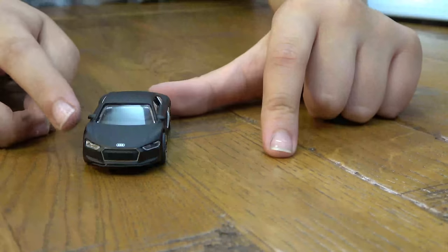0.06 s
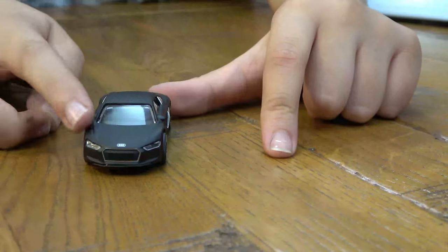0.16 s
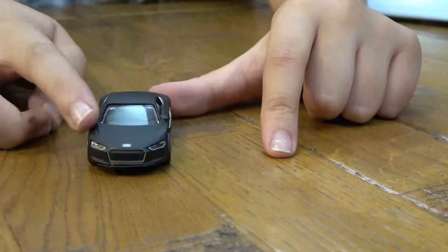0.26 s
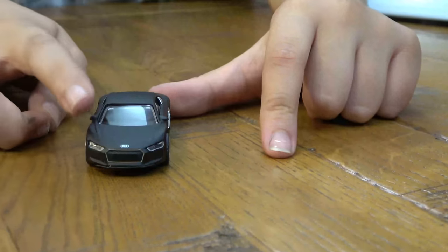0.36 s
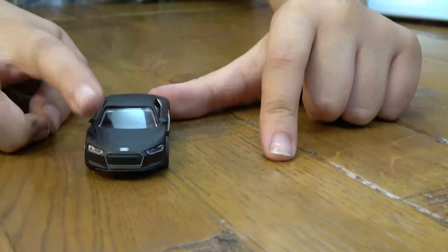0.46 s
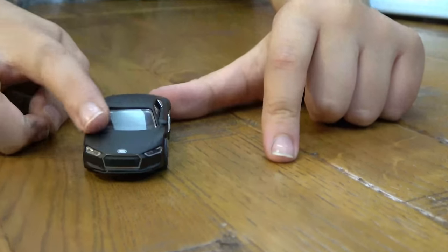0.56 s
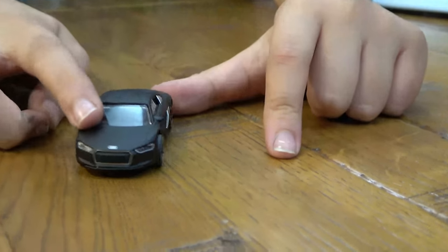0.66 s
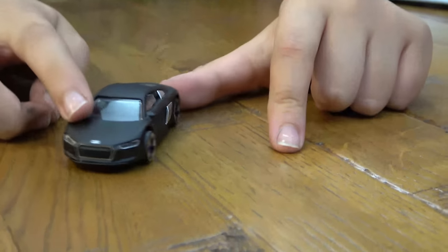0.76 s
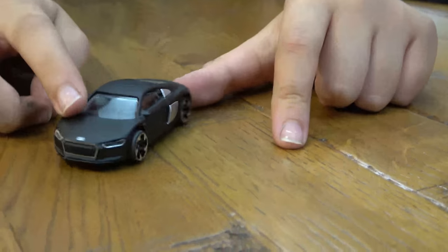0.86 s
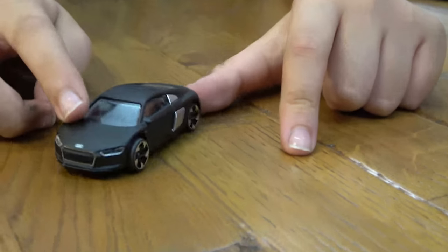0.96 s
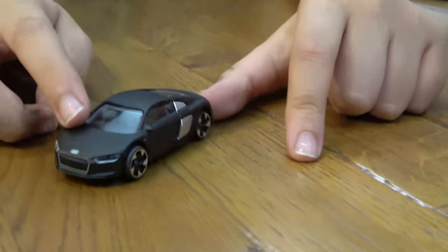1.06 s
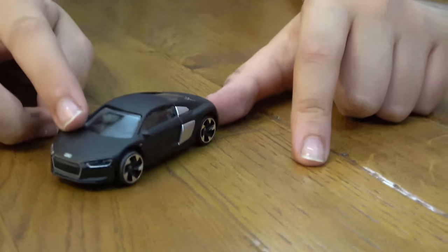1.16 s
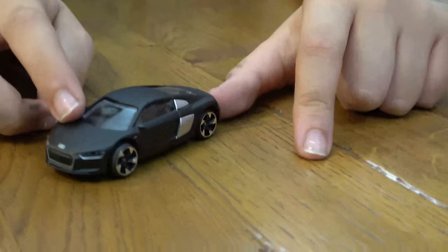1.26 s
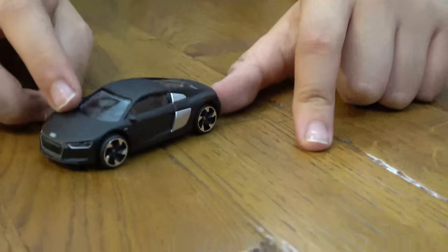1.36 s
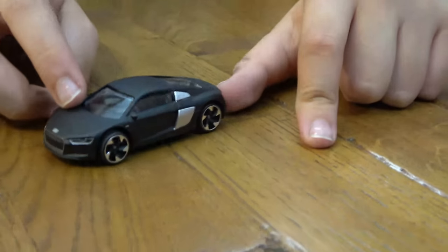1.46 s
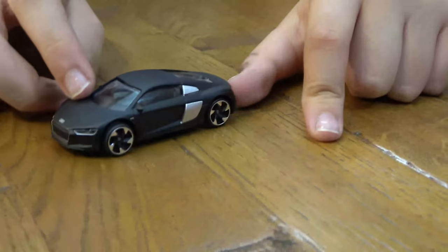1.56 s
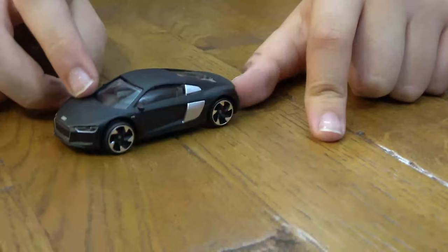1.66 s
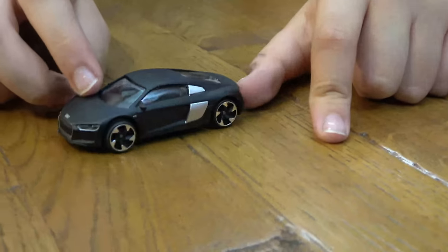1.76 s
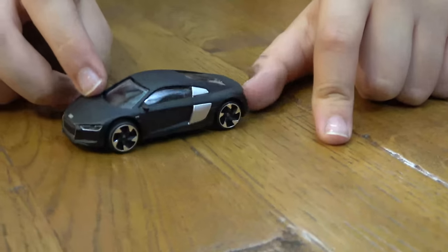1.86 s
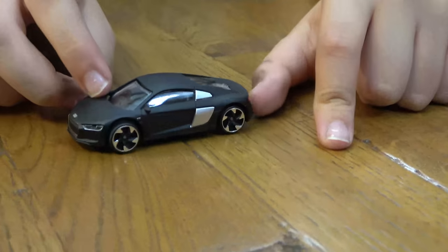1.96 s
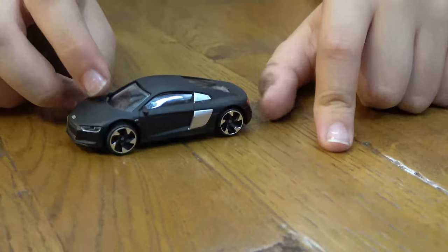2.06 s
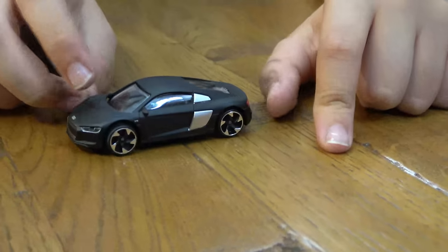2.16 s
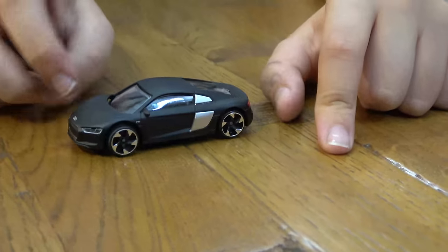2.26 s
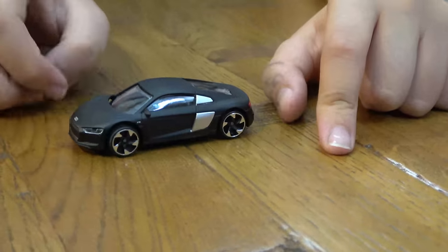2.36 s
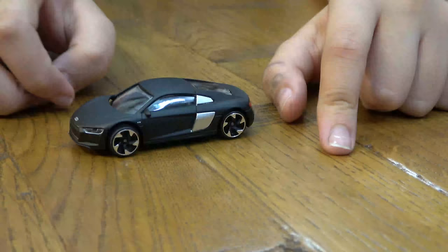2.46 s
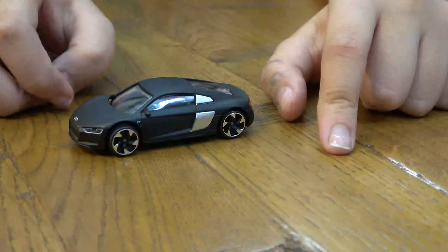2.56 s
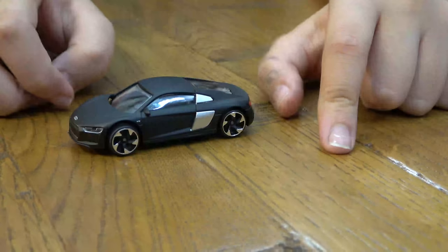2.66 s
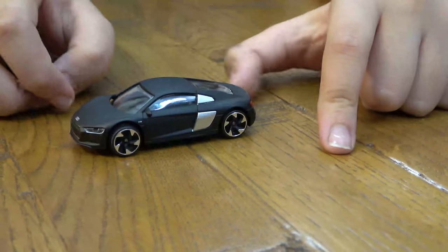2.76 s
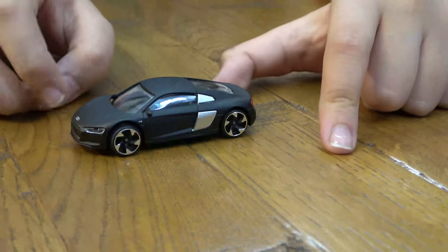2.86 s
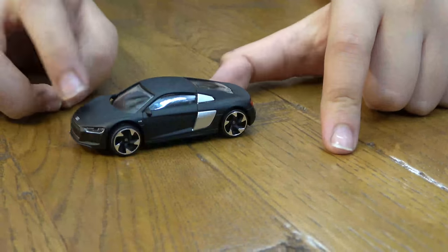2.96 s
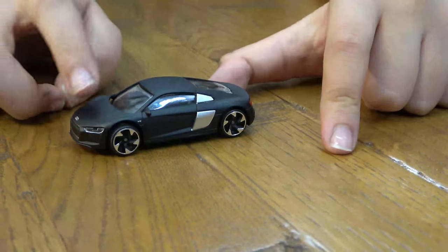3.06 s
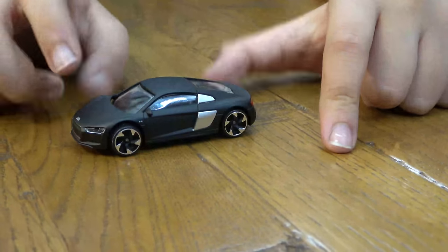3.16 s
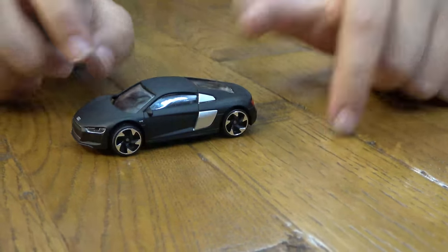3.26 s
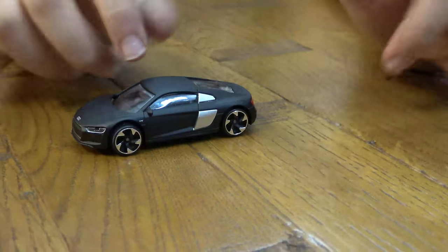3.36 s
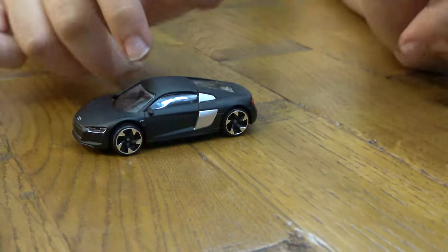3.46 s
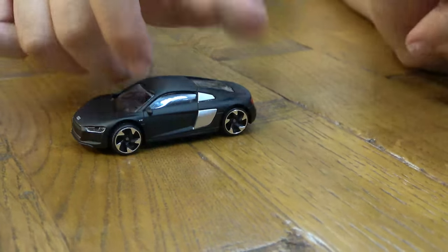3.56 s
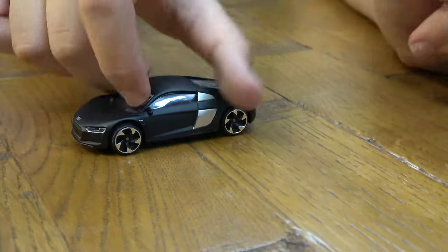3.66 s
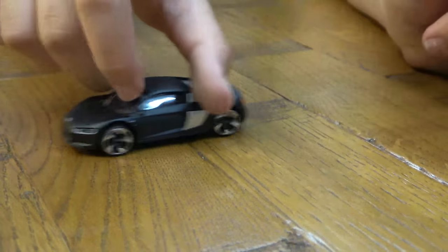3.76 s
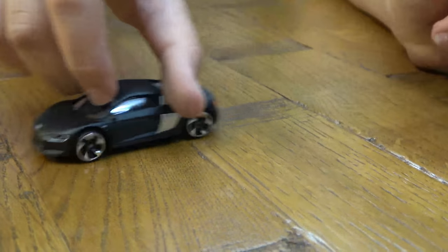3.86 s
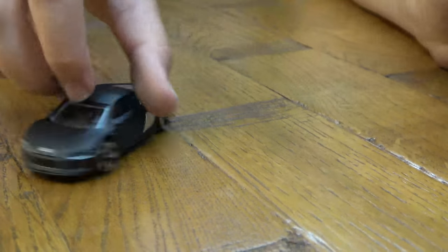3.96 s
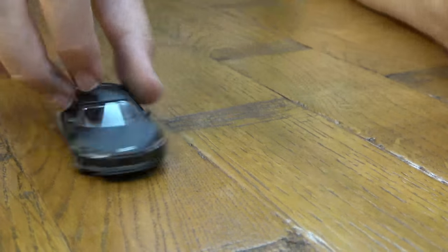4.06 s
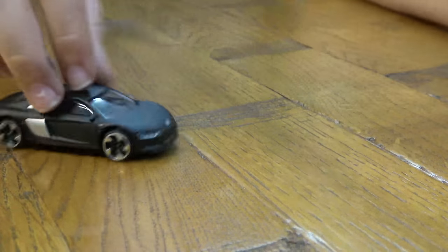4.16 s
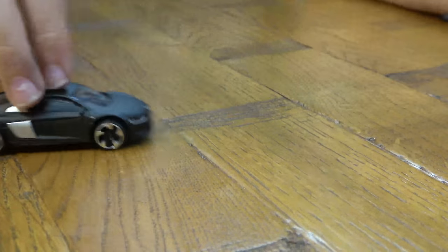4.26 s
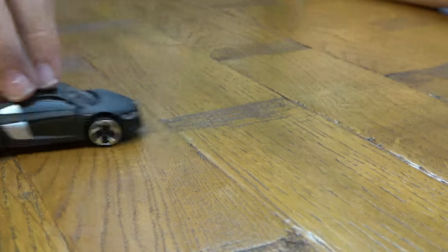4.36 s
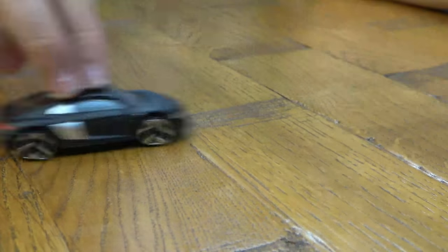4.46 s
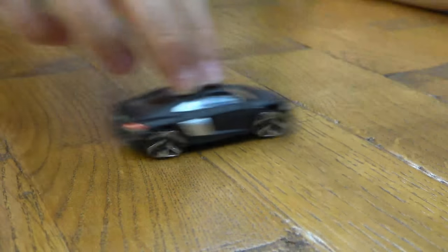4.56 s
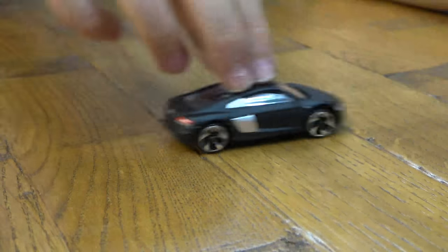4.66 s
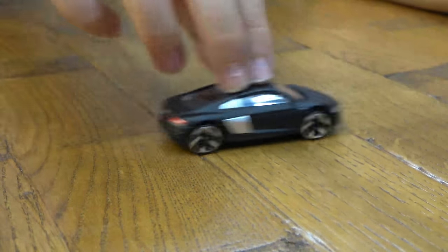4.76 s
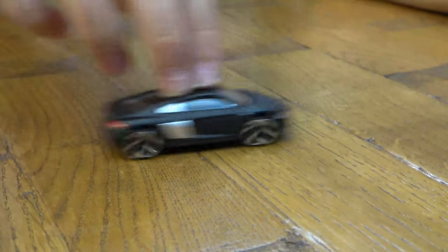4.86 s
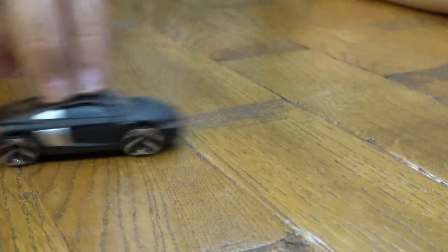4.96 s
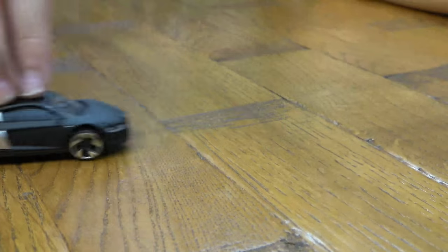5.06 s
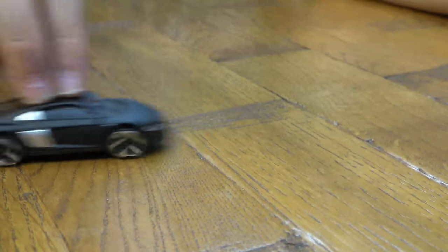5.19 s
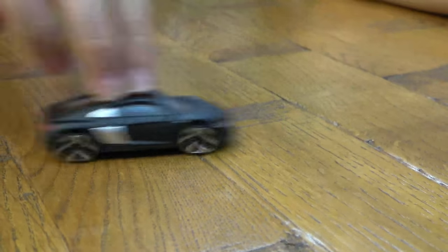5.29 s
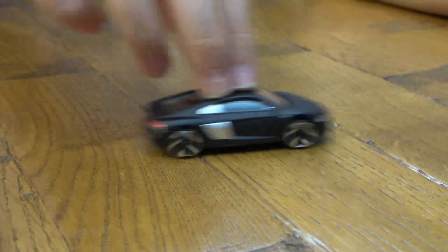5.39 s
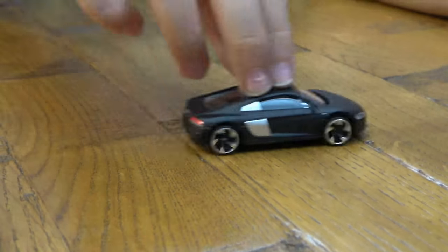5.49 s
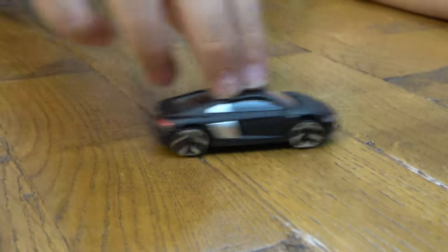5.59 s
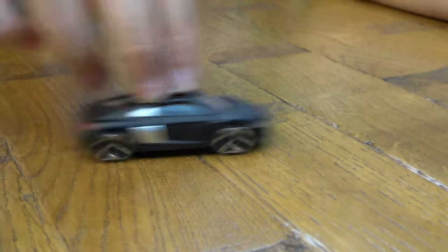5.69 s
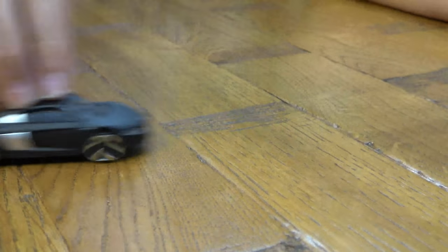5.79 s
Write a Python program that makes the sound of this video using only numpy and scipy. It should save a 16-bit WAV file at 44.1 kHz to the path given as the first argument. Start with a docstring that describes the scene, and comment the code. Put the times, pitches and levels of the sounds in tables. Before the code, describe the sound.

Close to a stereo microphone in a quiet room, a little metal toy car gives light, scattered clicks as it is handled, with faint skin rubs and soft bumps on the floorboards. A hand slides off the wood and the car scrapes round in a turn. Four fast pushes to and fro follow, each swelling into a bright, metallic wheel chatter with a light wooden rumble and a short, soft room echo.

```python
"""A die-cast toy car on a wooden floor, just in front of a stereo microphone in a quiet room.
Fingers brush it and nudge it round, so its loose axles tick; then a hand swings it sideways and
rolls it to and fro in four runs. The hard wheels chatter on the grain, ring the metal shell,
knock in their slots and make the boards rumble. The walls return a short, soft tail."""
import sys
import numpy as np
from scipy import signal
from scipy.fft import rfft, irfft
from scipy.io import wavfile
from scipy.ndimage import uniform_filter1d

SR = 44100
rng = np.random.default_rng(int(sys.argv[2]) if len(sys.argv) > 2 else 0)


def store_wav(level_fs):
    """Save 16-bit WAV to argv[1]."""
    pcm = np.round(np.clip(np.atleast_2d(level_fs), -1, 1) * 32767)
    wavfile.write(sys.argv[1], SR, pcm.T.astype(np.int16))


N = 257103
TIME = np.arange(N) / SR
SIZE = 4096  # samples in one blow or one filter response


def undb(db):
    """Decibels to gain."""
    return 10 ** (np.asarray(db) / 20)


def unit(x):
    """Scale to an energy of one."""
    return x / np.sqrt(np.sum(x ** 2) + 1e-30)


def steady(x, span_s):
    """Even out the slow level to an rms of one and keep the fine grain."""
    count = max(int(span_s * SR), 2)
    power = uniform_filter1d(uniform_filter1d(x ** 2, count), count)
    return x / np.sqrt(np.maximum(power, 0) + 1e-6 * np.mean(x ** 2))


def colour(x, points):
    """Minimum-phase filter with a spectrum of (freq_hz, gain_db) points."""
    hz, db = np.transpose(points)
    bins_hz = np.arange(SIZE // 2 + 1) * SR / SIZE
    gain = undb(np.interp(np.log(bins_hz + 1), np.log(hz), db))
    cepstrum = irfft(np.log(gain))
    cepstrum[1:SIZE // 2] *= 2
    cepstrum[SIZE // 2 + 1:] = 0
    return signal.fftconvolve(x, irfft(np.exp(rfft(cepstrum))))[:len(x)]


def low_cut(x, hz, order=2):
    """Roll off the bass below hz."""
    return signal.sosfilt(signal.butter(order, hz, "high", fs=SR, output="sos"), x)


def band(x, hz, width):
    """One resonance, gain one at its centre."""
    return signal.lfilter(*signal.iirpeak(hz, hz / min(width, SR / 3), fs=SR), x)


def resonate(x, modes):
    """Each contact lands elsewhere, so it feeds each mode with its own strength and sign."""
    return sum(undb(db) * band(x * rng.standard_normal(len(x)), hz, width) for hz, width, db in modes)


def bumps(per_s, spread_db):
    """Random tiny impacts on a rough surface, a few much larger than the rest."""
    hit = rng.random(N) < per_s / SR
    size = np.minimum(rng.exponential(size=N), 4)
    return hit * undb(spread_db * size) * rng.choice([-1, 1], N)


def swell(s, rise_s, fade_s):
    """An envelope that rises smoothly to its top at s and dies away."""
    return np.exp(-np.where(TIME < s, ((TIME - s) / rise_s) ** 2, (TIME - s) / fade_s).clip(0, 20))


# Spectrum of the quiet room around the microphone: freq_hz, gain_db
ROOM_COLOUR = [(15, -34), (25, -13), (134, -4), (185, -8.5), (309, -7), (373, -13.5), (560, -11),
               (775, -9.5), (863, -17), (988, -11.5), (1440, -23.5), (3160, -31), (4250, -31),
               (9320, -29.5), (16000, -34.5)]
# Faint resonances in its hum: pitch_hz, width_hz, level_db
ROOM_HUM = [(48.4, 2.6, -77.5), (124.8, 7.3, -75.5), (634, 120, -75), (779, 70, -80.5), (991, 56, -80)]

def room_tone(level_db=-69):
    """Steady, dull room noise with a faint hum, nearly alike on both sides."""
    mid, side = (colour(rng.standard_normal(N), ROOM_COLOUR) for _ in range(2))
    mid, side = (undb(level_db) * noise / noise.std() for noise in (mid, side))
    for hz, width, db in ROOM_HUM:
        hum = band(band(rng.standard_normal(N), hz, width), hz, width)
        mid += undb(db) * steady(hum, 0.2)
    side = colour(side, [(60, -14), (700, -13), (3000, -7), (12000, -4)])
    return np.array([mid + side, mid - side])


def burst(rise_s, fade_s):
    """A rapid flurry of tiny contacts as a loose part chatters to rest."""
    t = TIME[1:SIZE + 1]
    return unit(rng.choice([-1., 1.], SIZE) * (1 - np.exp(-t / rise_s)) * np.exp(-t / fade_s))


# Modes of the car's shell and base plate: pitch_hz, width_hz, gain_db
SHELL_MODES = [(1427.5, 15.5, -6.5), (1666, 54, -2), (1870, 23, -12), (2084, 60, 4), (2520, 26, -1),
               (2705, 50, 0.5), (2830, 220, -7), (3100, 21, -8), (3030, 66, -17), (3180, 23, -6.5),
               (3295, 37, -3), (4205, 7.7, 1.5), (4380, 220, -5), (4420, 55, -11.5), (6620, 210, -24),
               (9160, 120, -26)]
# Spectrum of a blow's bright edge, heard close: freq_hz, gain_db
EDGE_SPECTRUM = [(2000, -49), (5500, 2.5), (7000, 4.5), (8700, 5), (11000, -3), (13500, -12.5),
                 (16000, -22)]

def strikes(blows, spectrum, lag_s, rise_s, fade_s, gain_db, shell_db, damping,
            ring_db, ring_s, edge_gain_db, edge_s, top_db):
    """Each blow is a bright edge, a short chatter, the shell's modes and one ring that stands out."""
    out, t = np.zeros(N), TIME[:SIZE]
    # fingers on the shell change its damping, and so the width of its modes
    modes = [(hz, width * damping, db) for hz, width, db in SHELL_MODES]
    for start_s, body_db, ring_hz, edge_db in blows:
        contact = unit(burst(rise_s, fade_s) + 0.57 * burst(rise_s, 5 * fade_s))
        shell = unit(resonate(contact, modes))
        ring = unit(np.sin(2 * np.pi * ring_hz * t) * (1 - np.exp(-t / rise_s)) * np.exp(-t / ring_s))
        body = unit(unit(colour(contact, spectrum)) + undb(shell_db) * shell + undb(ring_db) * ring)
        edge = colour(burst(edge_s / 8, edge_s), EDGE_SPECTRUM)
        edge = unit(colour(edge, [(8000, 0), (14000, top_db)]))
        blow = undb(body_db + gain_db) * body + undb(edge_db + edge_gain_db) * edge
        slot = out[int((start_s + lag_s) * SR):][:SIZE]
        slot += blow[:len(slot)]
    return low_cut(out, 160)


# Spectrum of an axle's contact: freq_hz, gain_db
TICK_SPECTRUM = [(300, 6.5), (1000, -22), (2000, -14.5), (3000, 1.5), (3900, 4.5), (5200, -3.5), (6800, 2),
                 (9000, -29), (12000, -63), (16000, -31)]
# Ticks close to the microphone, levels relative: start_s, body_db, ring_hz, edge_db
AXLE_TICKS = [(0.2023, -49, 1540, -60.5), (0.6585, -37, 5480, -53), (0.6708, -28.5, 4110, -43),
              (0.7622, -33, 4500, -52), (0.7962, -29.5, 4080, -42), (0.8369, -33.5, 2080, -49),
              (0.8498, -34, 4270, -48), (0.8623, -28.5, 2300, -49), (0.8675, -33.5, 2070, -51),
              (0.9084, -37, 1650, -64), (0.9174, -34.5, 4160, -54), (0.937, -37, 4160, -50.5),
              (1.058, -34, 2000, -44.5), (1.061, -34, 2160, -53), (1.0804, -39, 3320, -55),
              (1.267, -43.5, 3490, -69), (1.2879, -39, 3540, -66), (1.4299, -36.5, 3540, -50),
              (1.4356, -39.5, 3640, -51), (1.4558, -38.5, 3520, -55), (1.8486, -47.5, 3450, -81),
              (1.9362, -51.5, 3570, -76), (2.0172, -46.5, 3400, -74), (3.2173, -54.5, 1500, -65)]

def axle_ticks():
    """The loose axles tick as fingertips nudge the car."""
    return strikes(AXLE_TICKS, TICK_SPECTRUM, lag_s=0.000983, rise_s=0.00035, fade_s=0.0012,
                   gain_db=11.5, shell_db=-5.5, damping=0.74, ring_db=-2, ring_s=0.0024,
                   edge_gain_db=17, edge_s=0.0019, top_db=-10)


def rub(grain, hz, width):
    """Friction heard through one steep resonance, with the treble softened."""
    sound = band(band(grain, hz, 1.9 * width), hz, 1.9 * width)
    return colour(sound / sound.std(), [(400, 3.5), (1200, 2), (6000, -4), (14000, -11.5)])


# Finger strokes on and beside the car, levels relative: peak_s, fade_s, level_db
FINGER_STROKES = [(.23, .04, -68.5), (0.38, 0.1, -71.5), (0.733, 0.31, -64.5), (1.165, 0.02, -65),
                  (1.27, .11, -67.5), (1.547, 0.33, -76.5), (2.0, .11, -76), (2.421, 0.058, -64),
                  (2.595, 0.046, -70), (2.855, 0.23, -69), (3.233, 0.14, -75.5), (3.707, 0.073, -70.5)]

def finger_brushes(grain, rise_share=0.35):
    """Skin brushes softly over paint and wood."""
    envelope = sum(undb(db) * swell(s, rise_share * fade_s, fade_s) for s, fade_s, db in FINGER_STROKES)
    return rub(grain, hz=2220, width=2060) * envelope


# Hands and car bumping the floor near the microphone: peak_s, pitch_hz, half_length_s, level_db
FLOOR_THUMPS = [(.25, 183, 0.014, -58), (.775, 168, 0.022, -53.5), (.855, 168, 0.025, -49),
                (.917, 169, 0.0082, -43.5), (1.09, 158, 0.017, -60), (1.292, 248, 0.049, -66.5),
                (2.03, 149, 0.035, -63.5), (2.915, 463, 0.0033, -59.5), (2.94, 280, 0.0044, -55.5),
                (3.692, 590, 0.0016, -50), (4.322, 140.7, 0.04, -44)]

def floor_thumps():
    """A soft push swells and fades over a few cycles of one board mode."""
    out = np.zeros(N)
    for peak_s, hz, half_length_s, db in FLOOR_THUMPS:
        t = TIME - peak_s
        envelope = np.exp(-((t / half_length_s) ** 2).clip(0, 30))
        out += undb(db) * envelope * np.sin(2 * np.pi * hz * t)
    return out


CREEP = 0.13  # share of full speed left at the ends of a push

def push(start_s, fastest_s, stop_s, ease_s=0.012):
    """Speed of the car in one push, 0-1: the hand speeds up and slows down along a sine arch."""
    arch = np.sin(np.interp(TIME, [start_s, fastest_s, stop_s], [0, np.pi / 2, np.pi]))
    moving = uniform_filter1d(1. * ((TIME > start_s) & (TIME < stop_s)), size=int(ease_s * SR) + 1)
    return np.clip(moving * (CREEP + (1 - CREEP) * arch), 0, 1)


def floor_patches(per_s=30, spread_db=2):
    """A gain that wanders as the wheels cross rough and smooth wood."""
    roughness = rng.standard_normal(1024)
    return undb(spread_db * np.interp(TIME * per_s, np.arange(len(roughness)), roughness))


# Modes of the floorboards under the car: pitch_hz, width_hz, gain_db
BOARD_MODES = [(84.5, 21, -15), (122.7, 22, -2.5), (157.3, 29, 1), (180, 15.6, 5), (209.7, 13, -4),
               (235.5, 24.6, -2.5), (272, 26, -7), (322, 11.4, -5.5), (436.7, 17, -13), (637, 200, -23)]
# Spectrum of hard wheels on wood, heard close: freq_hz, gain_db
WHEEL_SPECTRUM = [(300, -14), (600, -29.5), (1050, -11), (1400, -4.5), (1900, -22.5), (2400, 6.5),
                  (3000, 13), (3700, 8.5), (4400, 2), (5200, -1.5), (7000, -6.5), (9500, -22.5),
                  (12500, -24), (16000, -58)]

def wheels(pushes, bumps_per_s, spread_db, shell_db, treble_db, top_db,
           chatter_power, treble_power, rumble_power, even_s):
    """Wheels chatter through the shell and shake the boards, denser and louder with speed."""
    car_speed, chatter_gain, treble_gain, rumble_gain = np.zeros((4, N))
    for start_s, fastest_s, stop_s, chatter_db, rumble_db in pushes:
        speed = push(start_s, fastest_s, stop_s)
        car_speed += speed
        chatter_gain += undb(chatter_db) * speed ** chatter_power
        treble_gain += undb(chatter_db + treble_db) * speed ** treble_power
        rumble_gain += undb(rumble_db) * speed ** rumble_power
    grain = bumps(bumps_per_s * np.maximum(car_speed, CREEP), spread_db)
    # every bump sets the loose wheel buzzing for a millisecond or two
    buzz_energy = signal.lfilter([1], [1, -np.exp(-2 / (0.0017 * SR))], grain ** 2)
    buzz = np.sqrt(buzz_energy + 1e-12) * rng.choice([-1., 1.], N)
    chatter = unit(colour(buzz, WHEEL_SPECTRUM)) + undb(shell_db) * unit(resonate(buzz, SHELL_MODES))
    treble = signal.sosfiltfilt(signal.butter(3, 6500, "high", fs=SR, output="sos"), chatter)
    body = chatter_gain * steady(chatter - treble, even_s)
    edge = treble_gain * steady(colour(treble, [(8000, 0), (14000, top_db)]), 0.093)
    rumble = rumble_gain * steady(low_cut(resonate(buzz, BOARD_MODES), 75), 0.032)
    return floor_patches() * (body + edge + rumble)


# Turns in front of the microphone: start_s, fastest_s, stop_s, chatter_db, rumble_db
TURN_PUSHES = [(.805, .855, 0.984, -53.5, -54.5), (3.775, 3.84, 3.93, -47, -56),
               (3.895, 4.095, 4.329, -36.5, -49.5)]

def sideways_turns():
    """The wheels scrub across the wood as the hand swings the car round."""
    return wheels(TURN_PUSHES, bumps_per_s=3000, spread_db=6, shell_db=-0.5, treble_db=-13, top_db=-8.5,
                  chatter_power=1.41, treble_power=2.1, rumble_power=0.82, even_s=0.009)


# Small scuffs at the car, levels relative: peak_s, fade_s, level_db, pitch_hz, nominal_width_hz
SCUFF_SLIPS = [(.875, 0.027, -48, 2120, 160), (1.044, .02, -55.5, 2100, 500),
               (1.059, 0.018, -48.5, 2230, 1130), (2.212, 0.033, -60.5, 4770, 3650),
               (2.29, 0.017, -62.5, 4940, 9100), (2.881, 0.031, -52, 3500, 5700),
               (2.885, 0.044, -60.5, 1700, 920), (2.966, 0.034, -52.5, 4380, 800),
               (3.359, 0.0035, -51.5, 9200, 5500), (3.667, 0.014, -64, 3480, 1200),
               (3.702, 0.012, -56.5, 3100, 1800), (5.456, 0.0065, -35, 2130, 300)]

def scuffs(grain, rise_s=0.0063):
    """A nail or tyre catches and slips, squeaking where the band is narrow."""
    return sum(undb(db) * swell(s, rise_s, fade_s) * rub(grain, hz, width)
               for s, fade_s, db, hz, width in SCUFF_SLIPS)


# Spectrum of skin on the nearby boards: freq_hz, gain_db
SLIDE_SPECTRUM = [(240, -16), (400, 2.5), (964, -4), (1160, -3), (1290, -0.5), (3750, -3.5), (14100, -10.5),
                  (16000, -29)]

def hand_slide(grain, level_db=-56):
    """A hand slides off the boards with a short hiss."""
    hiss = steady(colour(grain, SLIDE_SPECTRUM), 0.062)
    return undb(level_db) * swell(3.45, rise_s=0.018, fade_s=0.055) * hiss


# Spectrum of a wheel's knock: freq_hz, gain_db
KNOCK_SPECTRUM = [(300, -40), (1000, -6), (1800, 9), (3000, 9), (4300, -3.5), (5300, 3), (8500, -10.5),
                  (12000, -17), (16000, -59)]
# The loudest knocks at the microphone, levels relative: start_s, body_db, ring_hz, edge_db
LOUD_KNOCKS = [(3.7813, -39, 3530, -47.5), (3.8075, -36, 2084, -49.5), (3.8362, -31.5, 4190, -41.5),
               (3.9205, -30.5, 2070, -60), (4.1227, -29, 2560, -48), (4.2253, -29, 3230, -49),
               (4.341, -33.5, 3260, -55), (4.4182, -26.5, 1960, -39), (4.4423, -24.5, 4260, -29.5),
               (4.4559, -21.5, 3070, -35), (4.4718, -19, 3130, -38), (4.5265, -18, 3060, -35),
               (4.5576, -16, 2870, -33), (4.5796, -15.5, 2970, -32), (4.5914, -18.5, 2820, -38),
               (4.6295, -27, 3260, -40), (4.6644, -17.5, 2650, -34.5), (4.816, -21, 3230, -41.5),
               (4.8284, -25.5, 2100, -43), (4.921, -23, 4210, -30.5), (4.953, -21, 4159, -38),
               (4.9723, -22, 3320, -34), (5.0079, -19, 3220, -34), (5.0376, -21.5, 3260, -36),
               (5.1715, -23.5, 3040, -45), (5.2217, -22, 1882, -39.5), (5.232, -25.5, 2760, -40),
               (5.2407, -23, 1946, -47), (5.2654, -18.5, 1945, -30), (5.3303, -17, 3070, -33),
               (5.3482, -16.5, 2100, -34.5), (5.4223, -28, 3050, -41), (5.4525, -23, 2110, -38),
               (5.4757, -20.5, 2460, -46), (5.6324, -27.5, 2800, -46), (5.6623, -20, 2050, -52),
               (5.7498, -20, 4250, -34.5), (5.7574, -18.5, 2630, -35), (5.8123, -18.5, 3010, -28.5)]

def wheel_knocks():
    """The wheels knock in their slots while the fingers damp the shell."""
    blows = list(LOUD_KNOCKS) + rattle(per_run=7)
    return strikes(blows, KNOCK_SPECTRUM, lag_s=0.0005, rise_s=0.00082, fade_s=0.0035,
                   gain_db=13, shell_db=-2, damping=2.8, ring_db=1, ring_s=0.0056,
                   edge_gain_db=19, edge_s=0.0018, top_db=2)


# Modes of the thin steel axles under the car: pitch_hz, width_hz, relative_db
AXLE_MODES = [(3980, 10, 8), (4130, 8.8, 0), (4360, 14, -9), (4760, 16, -5)]

def axle_ring(shaking, gain_db=3.5):
    """The shaken axles ring faintly and briefly after the wheels' knocks and chatter."""
    return sum(undb(gain_db + db) * band(shaking, hz, width) for hz, width, db in AXLE_MODES)


# Runs to and fro in front of the microphone: start_s, fastest_s, stop_s, chatter_db, rumble_db
RUN_PUSHES = [(4.381, 4.588, 4.736, -33.5, -44), (4.773, 4.942, 5.14, -37.5, -44.5),
              (5.159, 5.347, 5.555, -38, -44), (5.567, 5.772, 6, -36, -43)]

def straight_runs():
    """The wheels roll over the grain as the hand drives the car back and forth."""
    return wheels(RUN_PUSHES, bumps_per_s=1300, spread_db=3.5, shell_db=-3, treble_db=-15, top_db=1,
                  chatter_power=1.67, treble_power=2.16, rumble_power=0.91, even_s=0.031)


def rattle(per_run, body_db=8.5, edge_db=-3, scatter_db=3.5):
    """Rows of lesser knocks scattered through each run, stronger at speed; each picks out a shell mode."""
    rows = []
    for start_s, fastest_s, stop_s, chatter_db, _ in RUN_PUSHES:
        times = start_s + (stop_s - start_s) * (np.arange(per_run) + rng.random(per_run)) / per_run
        speed = np.interp(times, TIME, push(start_s, fastest_s, stop_s))
        levels = chatter_db + 20 * np.log10(speed ** 1.43 + 1e-6)
        levels += scatter_db * rng.standard_normal(per_run)
        rings = rng.choice([hz for hz, _, _ in SHELL_MODES if 1800 < hz < 4600], per_run)
        rows += [(s, db + body_db, hz, db + edge_db) for s, db, hz in zip(times, levels, rings)]
    return rows


def microphone_ports(x):
    """The two microphone ports hear close treble out of step; the bass leans right."""
    hz = np.arange(N // 2 + 1) * SR / N
    lean = undb(np.interp(hz, [60, 140, 250, 2000, 4000], [-13, -16, -36, -27, -50]))
    skew = undb(np.interp(hz, [250, 1200, 2500, 4500, 8500, 14000], [-22, -30, -23, -18, -13, -18]))
    side = irfft((lean + 1j * skew) * rfft(x), N)
    return np.array([x - side, x + side])


def wall_reflections(x, t60_s, wet_db, side_db):
    """Walls return a soft tail, light in the bass and widest in the treble."""
    t = TIME[:SR // 2]
    fade = np.exp(-np.log(1000) * t / t60_s) * (1 - np.exp(-t / 0.0037))
    mid, side = (unit(rng.standard_normal(len(t)) * fade) for _ in range(2))
    side = undb(side_db) * colour(side, [(200, -12), (2000, -5), (4000, 0), (8000, 5)])
    wall_colour = [(1000, 6), (4000, -3), (9000, 0.5), (15000, -7)]
    tails = [colour(tail, wall_colour) for tail in (mid + side, mid - side)]
    return undb(wet_db) * np.array([signal.fftconvolve(low_cut(x, 260), tail)[:N] for tail in tails])


def scene():
    """Ticks and a nudge, the sideways swing, then the runs, all just in front of the microphone."""
    nudging = axle_ticks() + sideways_turns()
    rolling = wheel_knocks() + straight_runs()
    grain = steady(bumps(per_s=3500, spread_db=1.7), 0.028)  # skin catches and slips in tiny steps
    hands = finger_brushes(grain) + floor_thumps() + scuffs(grain) + hand_slide(grain)
    near = nudging + rolling + axle_ring(rolling) + hands
    walls = wall_reflections(near, t60_s=0.3, wet_db=-8.5, side_db=-14)
    return microphone_ports(near) + walls + room_tone()


def record(dry):
    """The recorder drops the deepest bass and cuts the top."""
    high_cut = signal.ellip(10, 0.2, 70, 15900, fs=SR, output="sos")
    return signal.sosfilt(high_cut, low_cut(dry, 38, order=4))


dry = scene()
out = record(dry)
store_wav(out)
```